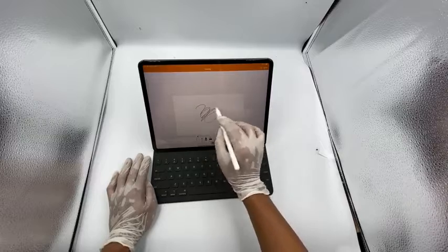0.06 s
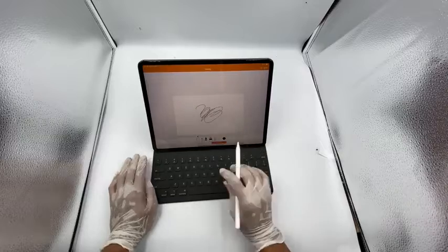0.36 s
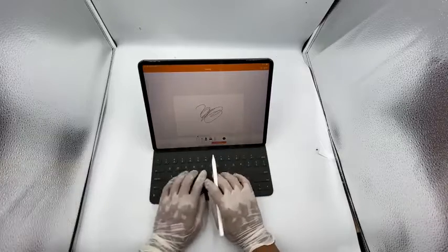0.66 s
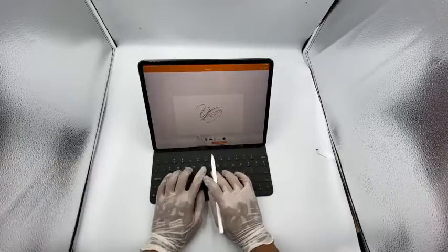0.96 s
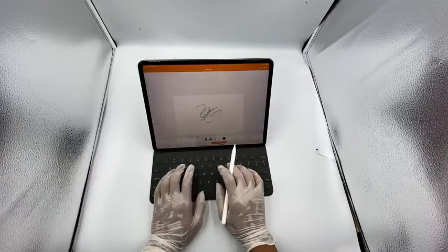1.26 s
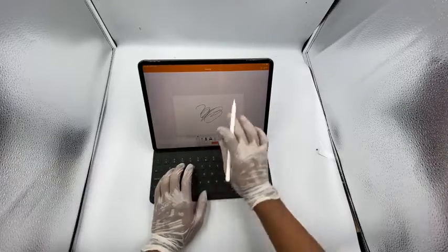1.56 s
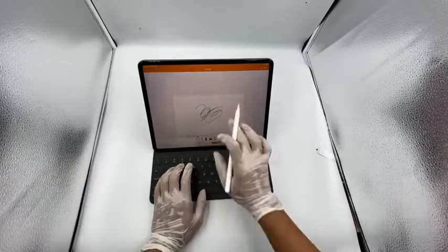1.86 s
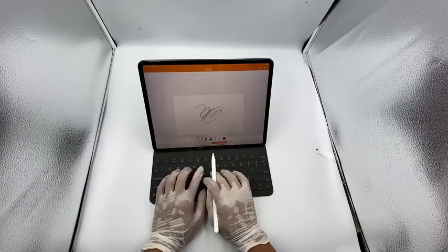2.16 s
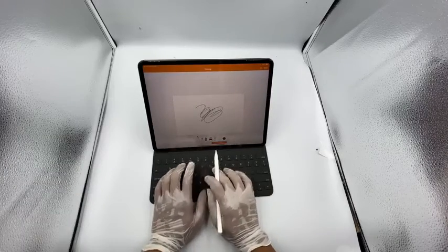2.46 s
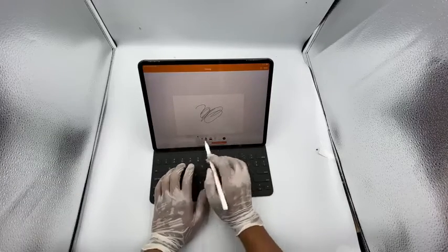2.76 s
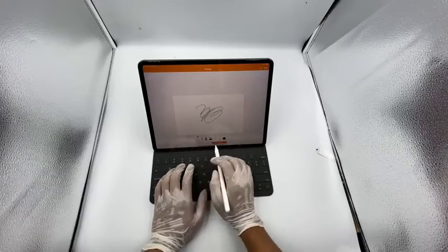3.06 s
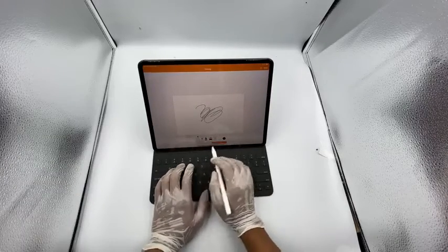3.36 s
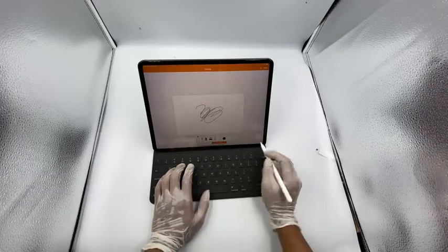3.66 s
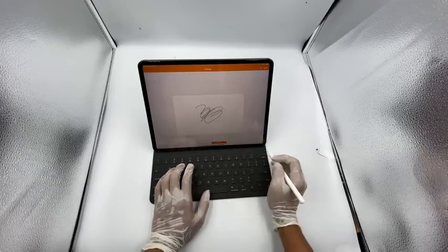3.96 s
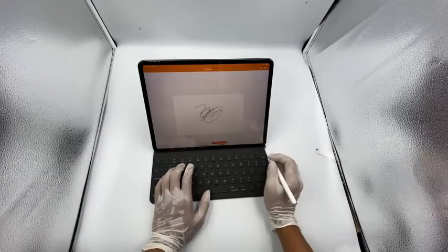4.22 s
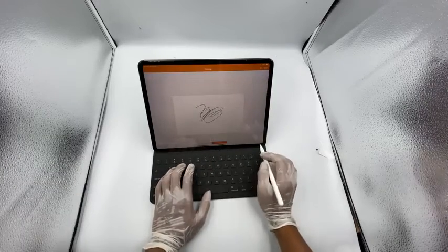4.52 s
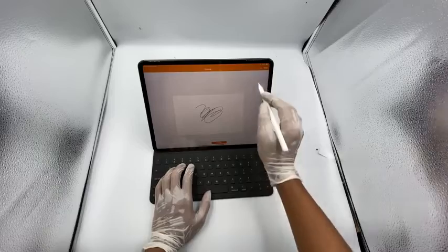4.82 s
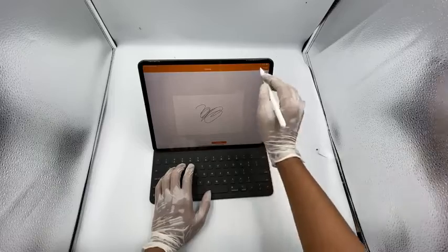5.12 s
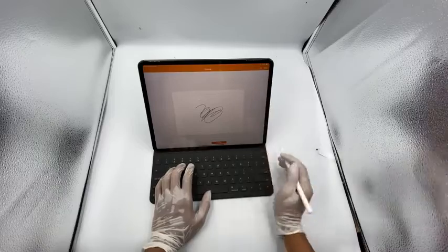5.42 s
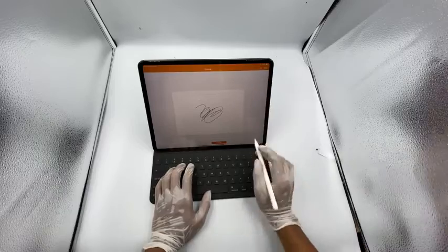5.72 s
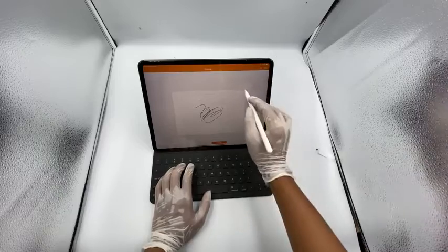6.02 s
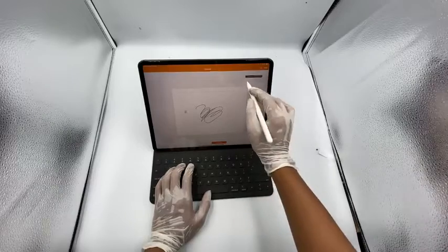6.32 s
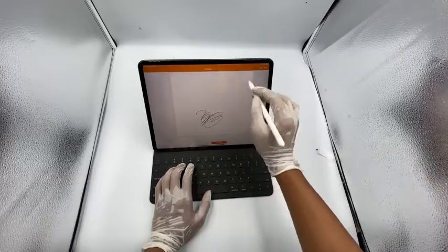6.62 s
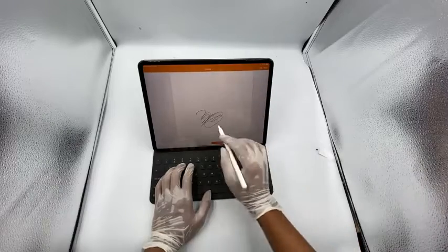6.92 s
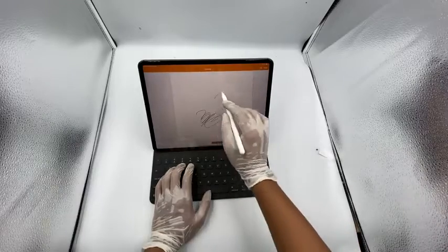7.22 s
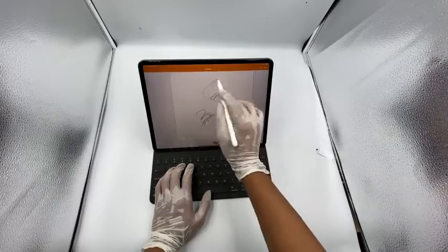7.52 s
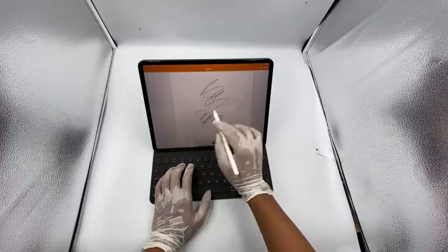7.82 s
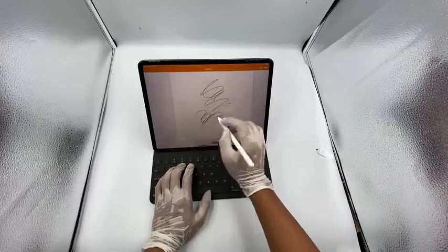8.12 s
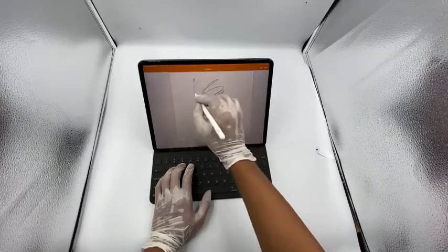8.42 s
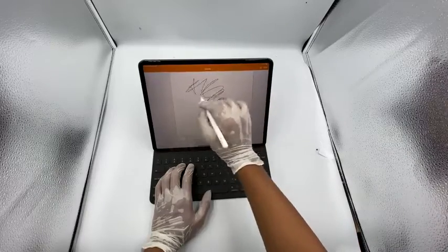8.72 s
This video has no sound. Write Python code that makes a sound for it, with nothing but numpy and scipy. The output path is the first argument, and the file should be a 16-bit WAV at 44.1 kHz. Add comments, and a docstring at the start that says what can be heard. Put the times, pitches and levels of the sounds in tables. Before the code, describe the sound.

A low, airy machine hum runs steadily throughout in a small indoor space, with everything else heard close and fairly quiet. Thin gloves rustle from the start and snap twice around half a second. From 0.7 to 1.1 seconds, a quick run of tablet keyboard keys clicks and clacks, with soft thumps through the table. A small hollow pop comes from the left at 1.4 seconds. A second run of typing lasts from about 2.0 to 2.4 seconds, and a fingertip bumps the cover with a deep, soft thud at 2.9. Then a stylus ticks and knocks lightly on the glass at about 3.8, 4.7, 5.2, 6.2 and 7.2 seconds, most clearly at 8.4, with a duller knock at 8.7. One faint key click falls near 5.5 seconds. Soft glove rustles, little snaps and faint high squeaks come and go between the taps.

```python
"""Gloved typing in a light tent

Gloved hands work a tablet with a keyboard cover inside a small fabric light tent. Keys click, clack
and thump on the table, a stylus ticks on the glass, a fingertip bumps the cover. The thin gloves
rustle, snap and squeak as the hands move. A machine hums steadily in the room, and a phone with
two microphone ports listens from above."""
import sys
import numpy as np
from scipy import signal
from scipy.fft import rfft, irfft, next_fast_len
from scipy.io import wavfile
from scipy.ndimage import uniform_filter1d

SR = 44100
rng = np.random.default_rng(int(sys.argv[2]) if len(sys.argv) > 2 else 0)


def unload_audio(sound):
    """Save the sound as a 16-bit wav file, at the path given as the first command line argument."""
    columns = np.transpose(np.atleast_2d(sound))
    # keep every value between -1 and 1, then stretch to whole-number steps
    steps = np.round(np.clip(columns, -1, 1) * 32767)
    wavfile.write(sys.argv[1], SR, steps.astype(np.int16))


N = 387198
T = np.arange(N) / SR
HIT = T[:SR // 5]  # time since a blow [s]

# EQ of a key's snap, tick, sparkle, dry clatter and padded deck ring: (frequency [Hz], level [dB])
SNAP_EQ = [(1200, -56.5), (1900, 5.5), (2170, -1.5), (2500, 15), (3050, 11), (3900, 11), (4500, -31.5),
           (5500, -13.5)]
TICK_EQ = [(3500, -5.5), (4900, 2.5), (5850, 1), (6500, 0), (7400, -1.5), (8600, -9), (9800, -18)]
SPARKLE_EQ = [(7500, -27), (8600, 2.5), (10200, 2), (11300, 3.5), (12500, -6.5), (15500, -39)]
CLATTER_EQ = [(400, -15), (700, 0), (1000, 5.5), (1350, 9), (1550, -8), (1800, -19), (2500, -34.5)]
PADDING_EQ = [(1400, 3), (1700, -19), (2500, -12)]
# Rings of the key mechanism (low, high), deck and table: (frequency [Hz], level [dB], t60 [s])
SNAP_MODES = [(2310, 17.5, 0.018), (2550, 11, 0.025), (2960, 5, 0.055), (3440, 9.5, 0.072),
              (3865, 7, 0.061)]
TICK_MODES = [(4670, 5, 0.041), (5060, 12.5, 0.034), (5720, 13, .03), (5800, 11.6, 0.067),
              (6170, 10, 0.019), (6800, 8.8, 0.031), (7500, 4, 0.03)]
DECK_MODES = [(620, -8.5, 0.037), (750, -1.5, 0.058), (944, 1.5, 0.1), (1129, -2, 0.035),
              (1207, -2.5, 0.043), (1308, 1.5, 0.1), (1463, 2.5, 0.076)]
TABLE_MODES = [(95, -14, .25), (163, -7.5, 0.23), (203.6, -2.5, 0.16), (268, 1, 0.12), (310.4, -9.5, 0.22),
               (426, -16, 0.083)]
# Presses, releases and light touches; hardness, depth, snap and sparkle ride on the force:
# (time [s], force [dB], hardness [dB], depth [dB], clack focus [Hz], snap [dB], sparkle [dB])
KEYSTROKES = [(0.7127, -43, -22, -5, 945, -5.5, -26), (0.733, -43, -12, -5, 980, -12, -25),
              (0.804, -42, -18, -4, 1240, -9, -28), (0.8523, -33.5, -23, -26, 950, -26, -35),
              (0.876, -35.5, -26, -11, 1150, -9, -37), (0.899, -34, -8.5, -15, 980, -10.5, -29),
              (0.9122, -42, -3.5, -16, 970, -8, -13), (0.9643, -38.5, -2.5, -7.5, 950, -4.5, -8),
              (0.9712, -44, -7, -3, 940, -6, -16), (1.032, -36, -13.5, -15, 950, -12.5, -24),
              (1.063, -37, -32, -14, 1050, -22, -35), (1.069, -31.5, -30, -17, 1010, -16, -35),
              (1.0734, -26.5, 0.5, -3.5, 1220, -0.5, -4), (1.129, -44.5, -7.5, -25, 935, -25, -30),
              (2.0513, -36, -7, -28, 940, -11, -22), (2.0887, -31, -0.5, -14, 1180, -5.5, -14),
              (2.155, -36, -16, -22, 935, -25, -35), (2.178, -51.5, -0.5, -14, 1130, -10, -16),
              (2.2252, -42, -18, -4, 933, -9, -27), (2.2705, -33, -15.5, -14, 1110, -15.5, -27),
              (2.2897, -31.5, -6, -15, 1310, -8.5, -26), (2.338, -35, -6, -6.5, 940, -7, -20),
              (2.3421, -35, -5, -7, 1150, -6, -23), (2.3693, -31.5, -15, -15, 1020, -21, -31),
              (2.389, -34, -12.5, -16, 935, -15, -21), (2.436, -45, -30, -25, 945, -31, -40),
              (5.4605, -51, -5.5, -6, 1130, -9, -17)]


def keys(clack_delay_s=0.00054, thump_delay_s=0.0011, side_db=-1):
    """A key clicks, the deck clacks, the table thumps; hard contacts are bright, deep strokes boom."""
    out = np.zeros((2, N))
    for start, force, hardness, depth, clack_hz, snap_db, sparkle_db in KEYSTROKES:
        snap = crack(SNAP_EQ, rise=.0008, t60=.014, tent_db=-20, tent_t60=.12)
        snap += undb(-1) * ring(SNAP_MODES, rise=.0006, scatter_db=2.5, detune=.004,
                                punch=3, punch_t60=.008)
        tick = crack(TICK_EQ, rise=.0008, t60=.011, tent_db=-23, tent_t60=.12)
        tick += undb(-1) * ring(TICK_MODES, rise=.0006, scatter_db=2.5, detune=.006,
                                punch=3, punch_t60=.007)
        # the finger stays down and damps the deck's first strong swing
        deck = ring(DECK_MODES, rise=.003, scatter_db=1.5, detune=.012,
                    focus_hz=clack_hz, focus_db_per_oct=7, punch=12, punch_t60=.01)
        clatter = crack(CLATTER_EQ, rise=.001, t60=.012, tent_db=-18, tent_t60=.07)
        sparkle = crack(SPARKLE_EQ, rise=.0008, t60=.016, tent_db=-24, tent_t60=.09)
        thump = ring(TABLE_MODES, rise=.003, scatter_db=1.5, detune=.012, punch=2, punch_t60=.06)
        click = undb(snap_db - 2.5) * snap + undb(hardness - 3) * tick + undb(sparkle_db - 1) * sparkle
        clack = undb(-2) * unit_blow(equalise(deck, PADDING_EQ)) + undb(-9) * clatter
        add(out, start, undb(force) * click * pan(side_db))
        add(out, start + clack_delay_s, undb(force) * clack * pan(side_db))
        add(out, start + thump_delay_s, undb(force + depth + 2) * thump)
    return out


# EQ of the tip on glass: (frequency [Hz], level [dB])
TIP_EQ = [(1200, -11), (2600, 4.5), (3900, 3.5), (5400, 2), (6600, 4), (9000, -3.5), (11000, -5),
          (15500, -17)]
# Body of the tablet: (frequency [Hz], level [dB], t60 [s])
TABLET_MODES = [(475, -7.5, 0.18), (570, -4.5, 0.032), (740, -3, 0.024), (860, -8, 0.015), (970, -8, 0.028),
                (1354, -1, 0.04), (1550, -6, 0.03)]
# Taps: (time [s], tick [dB], knock [dB], knock focus [Hz], ping pitch [Hz], ping over tick [dB])
STYLUS_TAPS = [(3.8103, -45, -43.5, 640, 3915, -6), (4.7356, -53, -62, 595, 6300, -11),
               (5.1751, -55.5, -49, 460, 4550, 2), (6.2133, -50, -44, 754, 4672, 2.5),
               (7.185, -48, -41.5, 854, 4500, -7), (8.4106, -43, -38.5, 740, 5800, -5),
               (8.7105, -76, -45.5, 750, 5950, -11)]


def stylus(knock_delay_s=0.00153, echo_delay_s=0.00537, echo_db=-7, side_db=2.5):
    """The tip ticks and pings on glass and knocks the tablet on its stand; the tent echoes the knock."""
    out = np.zeros((2, N))
    for start, tick_db, knock_db, knock_hz, ping_hz, ping_db in STYLUS_TAPS:
        tip = crack(TIP_EQ, rise=.0005, t60=.013, tent_db=-11, tent_t60=.1)
        tip += undb(ping_db) * ring([(ping_hz, 0, .018)], rise=.0004, scatter_db=0, detune=.004)
        knock = ring(TABLET_MODES, rise=.0015, scatter_db=.5, detune=.013,
                     focus_hz=knock_hz, focus_db_per_oct=12, punch=3, punch_t60=.008)
        knock *= undb(knock_db + 1)
        add(out, start, undb(tick_db - 3) * pan(side_db) * tip)
        add(out, start + knock_delay_s, knock)
        add(out, start + knock_delay_s + echo_delay_s, undb(echo_db) * knock)
    return out


# EQ of a fingertip on the cover: (frequency [Hz], level [dB])
POP_EQ = [(750, -15), (1200, -4), (1490, -10), (1850, 9), (2280, 3), (2800, 1), (3300, -4), (4200, -19),
          (7000, -45.5)]
# The cover's skin popping and the whole cover rocking: (frequency [Hz], level [dB], t60 [s])
POP_MODES = [(1426, 7.5, 0.042), (2055, 2, 0.037), (2440, -3.5, 0.034)]
COVER_MODES = [(106, -20, .2), (137, -8.5, 0.36), (167, -2.5, 0.14), (297, -2, 0.18)]
# Soft bumps: (time [s], pop [dB], thump [dB], pop tuning [ratio])
FINGER_BUMPS = [(1.3868, -46.5, -66, 1.12), (2.873, -41.5, -31.5, 0.974)]


def bumps(thump_delay_s=0.0016, side_db=15):
    """A padded fingertip pops the cover's skin, hollow and far left, and rocks it with a deep thump."""
    out = np.zeros((2, N))
    for start, pop_db, thump_db, tuning in FINGER_BUMPS:
        eq = [(hz * tuning, db) for hz, db in POP_EQ]
        modes = [(hz * tuning, db, t60) for hz, db, t60 in POP_MODES]
        pop = undb(-7) * crack(eq, rise=.0003, t60=.012, tent_db=-13, tent_t60=.08)
        pop += undb(-1) * ring(modes, rise=.0005, scatter_db=.5, detune=.005)
        thump = ring(COVER_MODES, rise=.0033, scatter_db=2, detune=0, punch=1.1, punch_t60=.057)
        add(out, start, undb(pop_db) * pan(side_db) * pop)
        add(out, start + thump_delay_s, undb(thump_db + 3) * thump)
    return out


# EQ of the glove film's fine hiss, coarse rustle and snap: (frequency [Hz], level [dB])
HISS_EQ = [(3500, -17), (6000, 0), (8000, -0.5), (10500, 2), (13000, 1), (15500, -12)]
COARSE_EQ = [(900, -32.5), (2000, 7.5), (4000, 6), (5500, 4), (8000, -4)]
FILM_EQ = [(2500, -0.5), (4500, 0.5), (6500, 3), (8500, 6.5), (11000, 1), (15500, -4)]
# Hand moves: (time [s], length [s], hiss [dB], coarse rustle over hiss [dB])
HAND_MOVES = [(0.208, 0.18, -69.5, -0.5), (0.378, 0.096, -59.5, -5), (0.44, 0.2, -67, -1),
              (0.554, 0.06, -59, -2.5), (0.595, 0.11, -70, -14), (0.685, 0.062, -62, 1.5),
              (0.736, 0.25, -65.5, 0), (0.981, 0.17, -63.5, 2.5), (1.234, 0.1, -73.5, -1),
              (1.462, 0.2, -65.5, -4.5), (2.09, 0.15, -68.5, 3.5), (2.247, 0.2, -65, -1),
              (2.506, 0.053, -76, -9), (2.652, 0.097, -63.5, -3.5), (2.793, 0.048, -65.5, -12),
              (2.824, 0.05, -60, -3.5), (3.222, 0.059, -72, -7), (3.3, 0.22, -71, 2.5),
              (3.504, 0.17, -74.5, -0.5), (3.87, 0.12, -77, -13), (4.312, 0.1, -84, 4),
              (5.26, 0.067, -80, -4), (5.449, 0.034, -67, 5), (5.523, 0.054, -78, -3),
              (5.597, 0.075, -78, -11), (5.72, 0.072, -66.5, -4), (5.85, 0.047, -71, -9),
              (6.642, 0.042, -74.5, -11), (6.68, .115, -74.5, -12), (6.868, 0.079, -79, -11),
              (7.42, 0.03, -81.5, -11), (7.925, 0.065, -71, -12), (8.072, 0.064, -66.5, -6),
              (8.163, 0.053, -65.5, -2), (8.287, 0.041, -78.5, 7.5), (8.45, .035, -78, -6),
              (8.524, 0.043, -79, -11), (8.757, .03, -72, 2.5)]
# Snaps of the film: (time [s], level [dB])
FILM_SNAPS = [(0.412, -43.5), (0.584, -42.5), (1.5286, -51), (1.9596, -59.5), (2.733, -64), (3.278, -61),
              (3.636, -54.5), (4.366, -62), (5.419, -60.5), (5.886, -57), (7.609, -64), (7.8386, -59),
              (8.673, -61)]


def gloves(fidget_db=-90, fidget_spread_db=3.5, fidgets_per_s=9.2, side_db=3):
    """Hands rustle under uneven pressure, fingers stir faintly between moves, and the film snaps."""
    hiss_power = undb(fidget_db + fidget_spread_db * np.clip(wander(fidgets_per_s), -2, 2)) ** 2
    coarse_power = np.zeros(N)
    for start, length, db, coarse_db in HAND_MOVES:
        move = undb(db) * swell(start, length, release_t60=.16)
        hiss_power += (move * undb(-1)) ** 2
        coarse_power += (move * undb(coarse_db)) ** 2
    hiss = crinkle(HISS_EQ, slips_per_s=300, spread_db=5.5, floor=.15, smear_t60=.06)
    coarse = crinkle(COARSE_EQ, slips_per_s=790, spread_db=2.5, floor=.11, smear_t60=.1)
    out = np.sqrt(hiss_power) * hiss + np.sqrt(coarse_power) * coarse
    out *= undb(wander(35))  # uneven pressure
    for start, db in FILM_SNAPS:
        add(out, start, undb(db - 2) * crack(FILM_EQ, rise=.00054, t60=.022, tent_db=-6, tent_t60=.15))
    return out * pan(side_db)


def crinkle(eq, slips_per_s, spread_db, floor, smear_t60, creases=6, drift_db=3):
    """Film slides in tiny uneven slips, smeared by the tent; each crease drifts in its own colour."""
    spectrum, size = 0, next_fast_len(N)
    hz = np.fft.rfftfreq(size, 1 / SR)
    decay = undb(-60 / smear_t60 / SR) ** 2
    for _ in range(creases):
        slips = rng.random(N) < slips_per_s / creases / SR
        energy = undb(spread_db * np.minimum(rng.exponential(size=N), 3)) ** 2
        power = signal.lfilter([1], [1, -decay], slips * energy)
        grains = rng.standard_normal((2, N)) * np.sqrt(floor + power / power.mean())
        grains *= undb(drift_db * np.clip(wander(30), -1.5, 1.5))
        crease_db = np.interp(hz, np.linspace(0, SR / 2, 90), rng.uniform(-20, 0, size=90))
        spectrum += rfft(grains, size) * undb(crease_db)
    return unit_rms(irfft(spectrum * undb(curves(eq, hz)[0]), size)[:, :N])


# Glove squeaks: (time [s], length [s], pitch [Hz], level [dB], width [share of pitch])
FILM_SQUEAKS = [(0.931, 0.027, 10900, -59.5, 0.19), (1.553, .08, 12200, -69, .16),
                (1.62, 0.1, 13300, -72, 0.15), (2.674, 0.042, 12100, -59.5, 0.3),
                (2.82, 0.044, 12900, -58, 0.43), (2.948, .03, 11700, -68, 0.31),
                (3.128, 0.028, 9000, -78, .1), (3.18, 0.04, 9200, -73, .1), (3.376, .04, 9250, -71, .1),
                (3.603, 0.074, 8250, -72, 0.27), (4.416, 0.022, 7500, -70, 0.27),
                (4.504, 0.034, 6900, -74, 0.39), (5.719, 0.03, 7500, -62.5, 0.31),
                (6.74, .04, 13500, -71, 0.28), (6.928, .02, 10700, -72, 0.33),
                (8.086, 0.03, 10500, -65.5, 0.19)]


def squeaks(flicker_db=3, slips_per_s=110, side_db=3):
    """Taut film sticks and slips, singing in fits around one high pitch: thin whistle to airy swish."""
    out = np.zeros((2, N))
    grip = unit_rms(undb(flicker_db * np.clip(wander(slips_per_s), -2, 2)))
    for start, length, hz, db, width in FILM_SQUEAKS:
        noise = rfft(rng.standard_normal((2, SR)))  # one second, so bins are 1 Hz apart
        whistle = unit_rms(irfft(noise * bell(np.arange(noise.shape[1]), hz, width * hz)))
        envelope = undb(db) * swell(start, length, release_t60=.1) * grip
        envelope = envelope[int(start * SR):][:SR]
        add(out, start, envelope * whistle[:, :len(envelope)])
    return out * pan(side_db)


# EQ of the machine's air noise: (frequency [Hz], level [dB])
AIR_EQ = [(45, -5), (72, -6.5), (115, 0.5), (170, 6), (245, -5.5), (400, -4.5), (780, -10), (1450, -9.5),
          (1950, -11), (2900, -25.5), (4000, -27), (4700, -35.5), (11000, -44), (15000, -47.5)]
# Peaks and one slight dip in the background noise: (frequency [Hz], width [Hz], gain [dB])
AIR_BELLS = [(300.6, 37, 7), (486, 94, 4.5), (750, 170, 5.5), (1027, 124, 5.5), (1373, 170, 9.5),
             (1630, 210, -1)]
# Hum tones: (frequency [Hz], level [dB], left minus right [dB], waver [Hz])
HUM_TONES = [(92.2, -61.5, -7, .7), (205.3, -65, -5, 3.96), (316, -64, 0.5, 4.9), (404, -71, -8.5, 6.07),
             (598, -62, -5.5, 2), (632, -71, -17.5, 5.05), (947.5, -71, 5, 20)]
# Stereo image at the two ports, for the air and every ring:
# (frequency [Hz], left lag [rad], likeness [0-1], left minus right [dB])
PORT_IMAGE = [(101, 0, 0.96, -3), (304, 0, 0.94, -3), (758, 0.62, 0.79, -1), (990, 1, 0.37, -1),
              (1317, 2.5, 0.63, 6), (1493, 3.5, 1, -2.5), (1704, 3, 1, 2), (2010, 3.5, 0.8, 1.5),
              (2520, 4.5, 0.53, -1), (2700, 7, 0.6, 1.5), (3860, 9, 0, 2), (9180, 6, 0.03, 6)]


def machine(air_db=-52.5, flutter_db=2.1):
    """A running machine lays a bed of air noise, near mono in the bass, and gently wavering hum."""
    size = next_fast_len(N)
    hz = np.fft.rfftfreq(size, 1 / SR)
    lag, likeness, side = curves(PORT_IMAGE, hz)
    noise = rfft(rng.standard_normal((3, size)))
    shared = noise[2] * np.array([np.exp(-1j * lag), np.ones(len(hz))])
    air = np.sqrt(likeness) * shared + np.sqrt(1 - likeness) * noise[:2]
    eq_db = curves(AIR_EQ, hz)[0] + sum(db * bell(hz, centre, width) for centre, width, db in AIR_BELLS)
    out = undb(air_db) * unit_rms(irfft(air * pan(side) * undb(eq_db))[:, :N])
    for tone_hz, db, side_db, waver_hz in HUM_TONES:
        phase = 2 * np.pi * np.cumsum(tone_hz + waver_hz * wander(30)) / SR
        out += np.sqrt(2) * undb(db + flutter_db * wander(5)) * np.sin(phase) * pan(side_db)
    return out


def crack(eq, rise, t60, tent_db, tent_t60):
    """Contact transient: a short noise burst with a quick tail off the tent walls; times in seconds."""
    fade = undb(-60 * HIT / t60) + undb(tent_db - 60 * HIT / tent_t60)
    burst = rng.standard_normal((2, len(HIT))) * fade * (1 - np.exp(-HIT / rise))
    return unit_blow(equalise(burst, eq))


def ring(modes, rise, scatter_db, detune, focus_hz=0, focus_db_per_oct=0, punch=0, punch_t60=.0041):
    """Damped modes, weighted anew by each place of contact; punch adds a strong, short first swing."""
    hz, db, t60 = np.array(modes, float).T[:, :, None]
    pitch_draw, level_draw, phase_draw, lag_draw = rng.standard_normal((4, len(hz), 1))
    hz = hz * (1 + detune * pitch_draw)
    db = db + scatter_db * level_draw - focus_db_per_oct * np.abs(np.log2(hz / (focus_hz + 1)))
    decay = undb(-60 * HIT / t60) + punch * undb(-60 * HIT / punch_t60)
    envelope = undb(db) * decay * (1 - np.exp(-HIT / rise))
    phase = 2 * np.pi * hz * HIT + phase_draw / 2
    lag, likeness, side = curves(PORT_IMAGE, hz)
    lag += (1 - likeness) ** 2 * lag_draw  # short waves reach the two ports in any phase
    left = envelope * undb(side / 2) * np.sin(phase - lag)
    right = envelope * undb(-side / 2) * np.sin(phase)
    return unit_blow(np.array([left.sum(0), right.sum(0)]))


def swell(start, length, release_t60, attack_share=0.37):
    """Envelope of a hand move: it gathers speed, holds and dies away."""
    attack = np.clip((T - start) / (attack_share * length), 0, 1)
    return attack * undb(-60 * np.clip((T - start - length) / release_t60, 0, 2))


def wander(per_s):
    """Smooth random modulation with a spread near 1."""
    step = max(int(SR / per_s), 2)
    return 1.158 * uniform_filter1d(np.repeat(rng.standard_normal(N // step + 1), step), step)[:N]


def equalise(x, eq, size=4096):
    """Minimum-phase EQ, built from the cepstrum of its log gain."""
    gain = undb(curves(eq, np.fft.rfftfreq(size, 1 / SR))[0])
    cepstrum = irfft(np.log(gain))
    cepstrum[1:size // 2] *= 2
    cepstrum[size // 2 + 1:] = 0
    impulse = irfft(np.exp(rfft(cepstrum)))
    return signal.fftconvolve(x, impulse[None], axes=-1)[:, :x.shape[-1]]


def curves(table, hz):
    """A table's value columns, read on a log-frequency axis."""
    table_hz, *columns = np.array(table, float).T
    return [np.interp(np.log(hz + 1), np.log(table_hz), column) for column in columns]


def bell(hz, centre, width):
    """Bell-shaped EQ curve, 1 at its centre."""
    return 1 / (1 + (2 * (hz - centre) / width) ** 2)


def undb(db):
    """Decibels to gain."""
    return 10 ** (np.asarray(db) / 20)


def pan(db):
    """Channel gains for a left-minus-right level."""
    return undb(np.array([[1], [-1]]) * db / 2)


def unit_rms(x):
    """Scale to rms 1."""
    return x / np.sqrt(np.mean(x ** 2))


def unit_blow(x):
    """Scale a stereo hit to the energy of 4 ms at rms 1."""
    return x / np.sqrt(np.sum(x ** 2) / 2 / (.004 * SR))


def add(out, start, x):
    """Mix a sound in at its start time [s]."""
    i = max(int(start * SR), 0)
    out[:, i:i + x.shape[1]] += x[:, :N - i]


def scene():
    """Keys, taps and glove foley over the machine's bed."""
    return keys() + stylus() + bumps() + gloves() + squeaks() + machine()


def record(dry, low_cut_hz=68, high_cut_hz=15800):
    """The phone cuts the deep bass and the very top."""
    lean = signal.sosfilt(signal.butter(5, low_cut_hz, "high", fs=SR, output="sos"), dry)
    return signal.sosfilt(signal.ellip(10, .2, 70, high_cut_hz, fs=SR, output="sos"), lean)


dry = scene()
out = record(dry)
unload_audio(out)
```